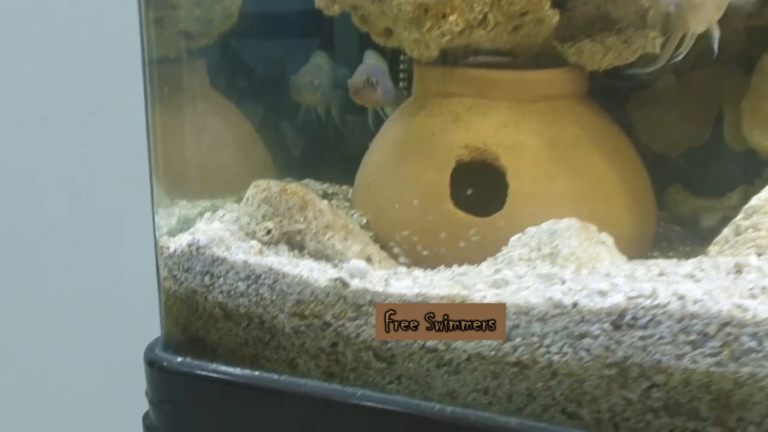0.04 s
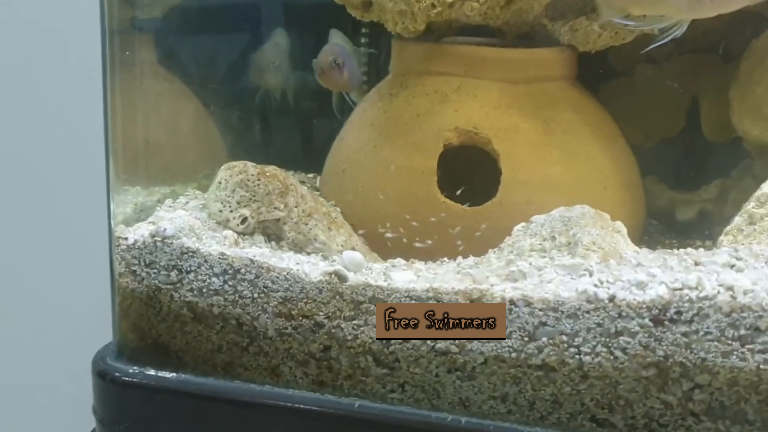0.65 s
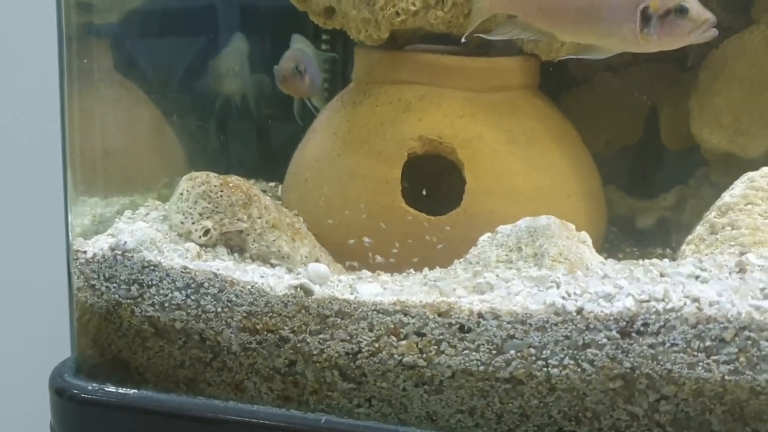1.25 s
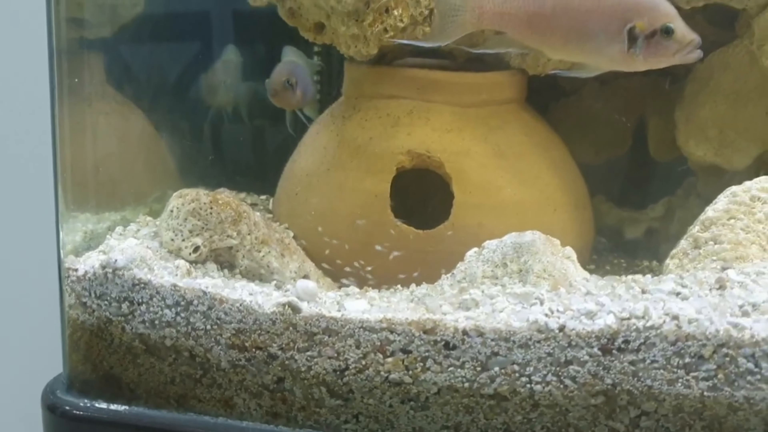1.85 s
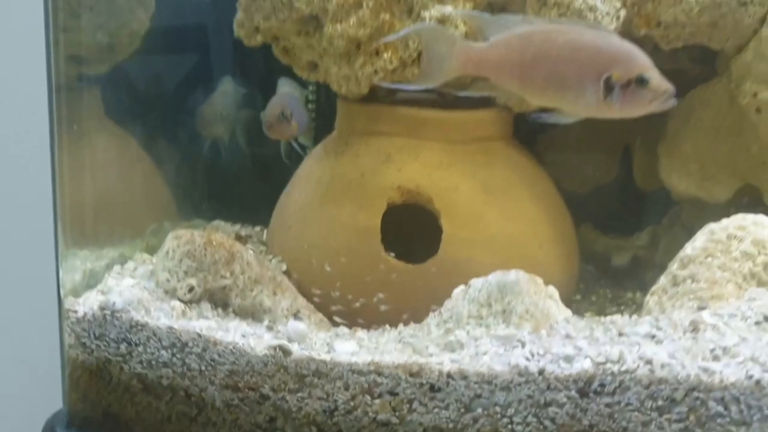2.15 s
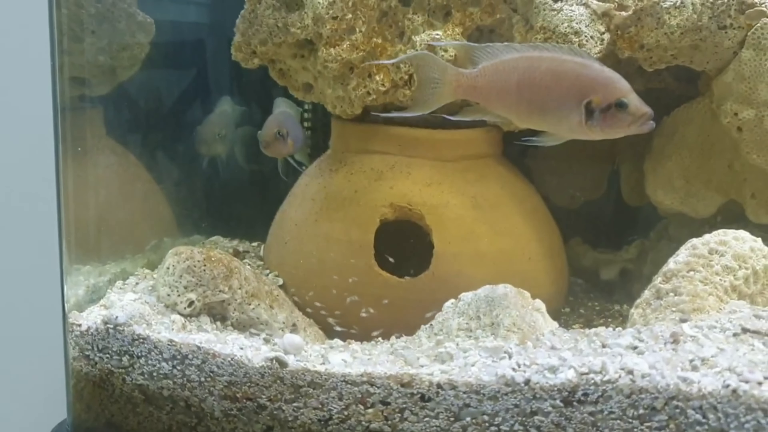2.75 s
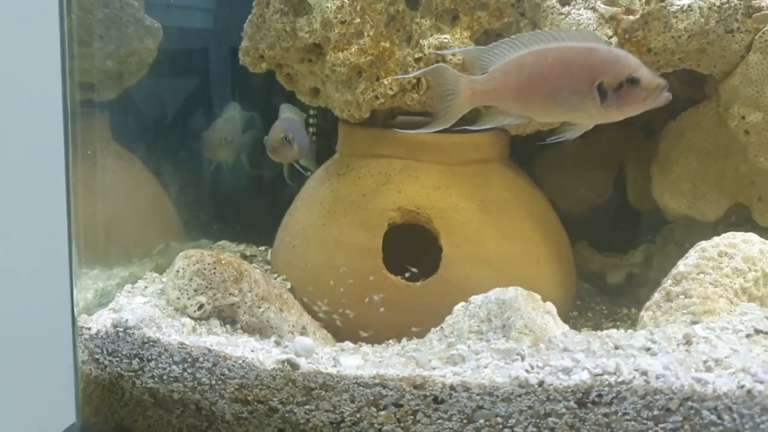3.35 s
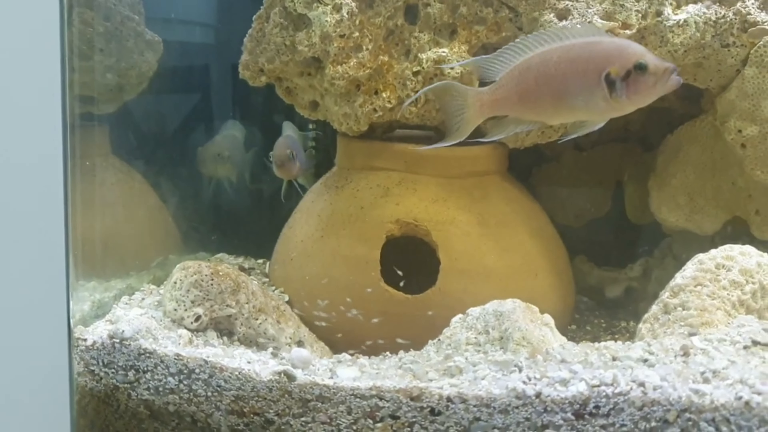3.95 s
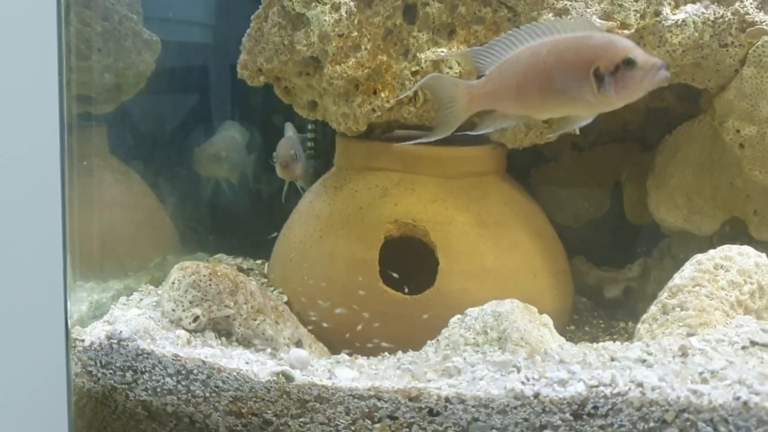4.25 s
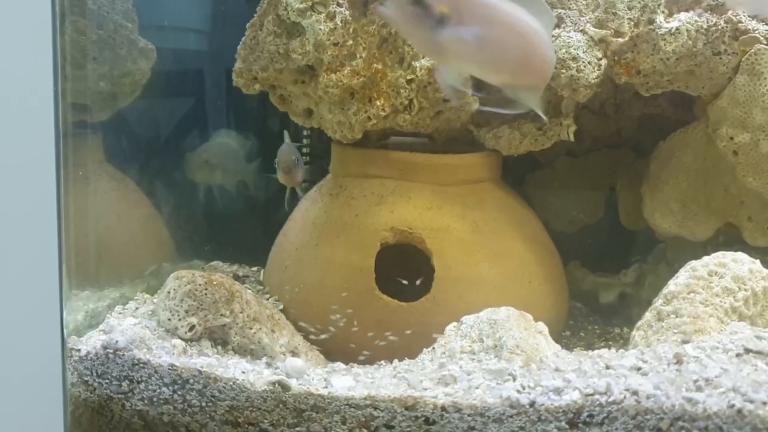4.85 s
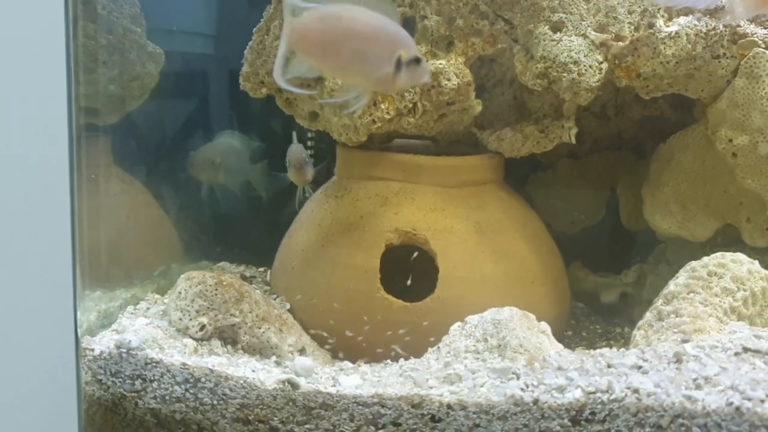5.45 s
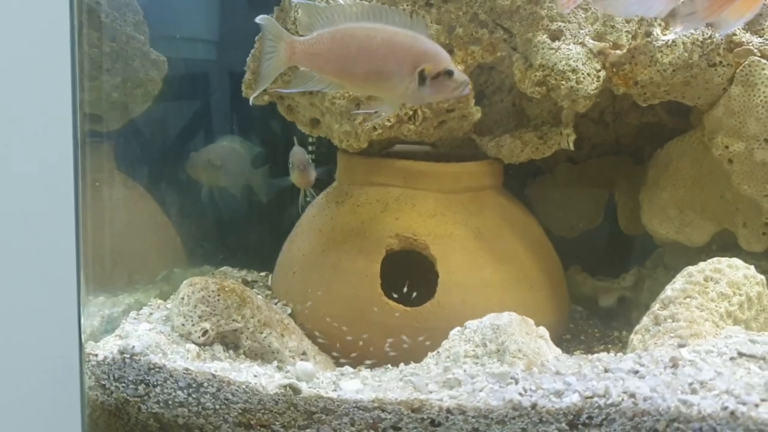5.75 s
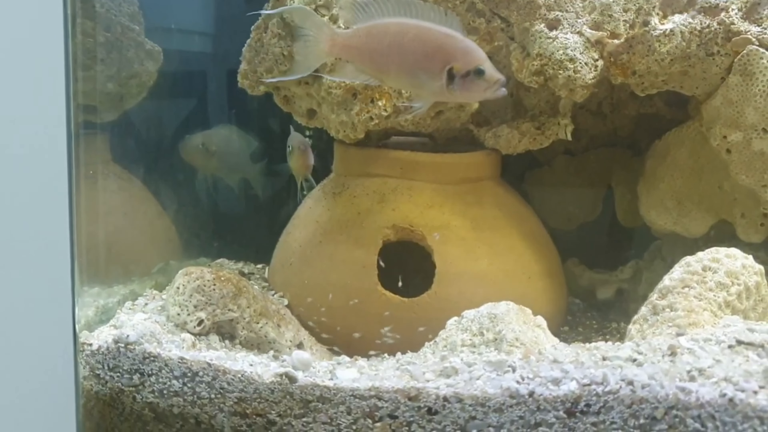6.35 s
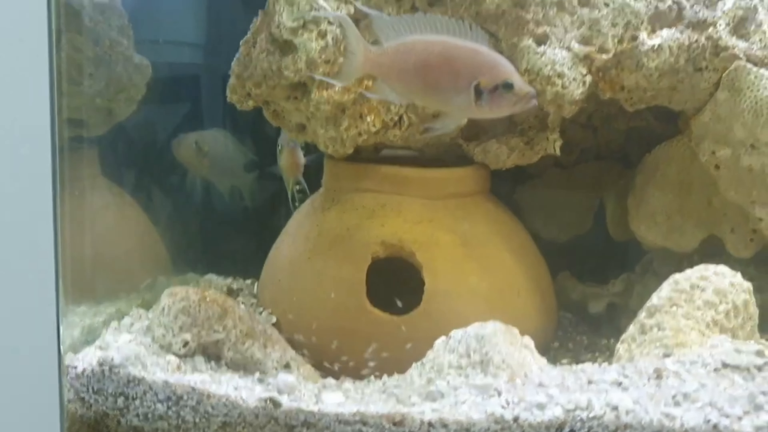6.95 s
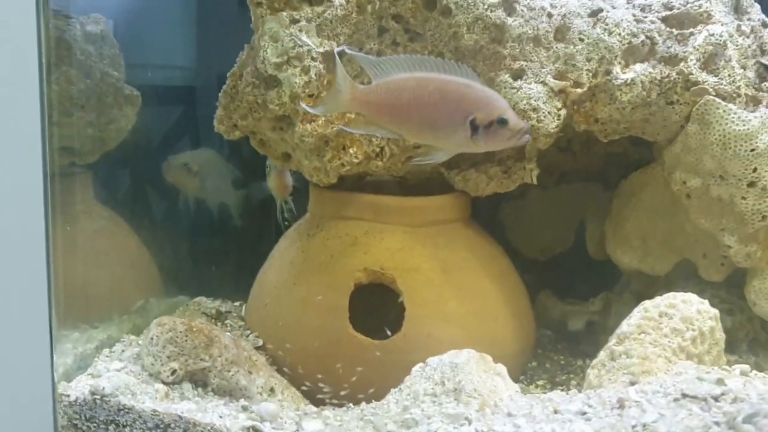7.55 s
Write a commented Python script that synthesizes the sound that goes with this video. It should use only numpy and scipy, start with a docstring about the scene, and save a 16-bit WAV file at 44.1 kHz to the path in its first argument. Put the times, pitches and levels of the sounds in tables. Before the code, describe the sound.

An aquarium pump hums low and steady throughout in a small room, with a slightly throbbing electrical buzz and a fan-like tone that gently swells and sinks. Moving water and air make a dull rumble, and a very faint hiss flickers on the right. Between about 1 and 3 seconds the water wells up several times, with soft, low thumps near 1.5 and 2.3 seconds. A faint rub comes from the right at around 1.5 to 1.8 seconds. Soft rubbing and rustling returns on the right from about 5.1 to 5.5 seconds. At about 6.3 seconds there is one short, clinking knock that rings briefly in the room, surrounded by more rustling until 6.6 seconds. A few lighter rubs follow up to about 7.2 seconds, while the hum continues unchanged to the end at around 7.5 seconds.

```python
"""A small room with an aquarium. The pump's motor hums, turning just slower than the mains current that
makes it buzz, beside a fan-like tone. Moving water and air rumble below a faint, flickering hiss, and
early on the water wells up a few times. Off to the right something rubs and rustles softly now and then,
once with a short, clinking knock that rings in the room."""
import sys
import numpy as np
from scipy import signal
from scipy.fft import rfft, irfft, next_fast_len
from scipy.io import wavfile
from scipy.ndimage import map_coordinates

SR = 44100
rng = np.random.default_rng(int(sys.argv[2]) if len(sys.argv) > 2 else 0)


def wav_out(sig):
    """Save sig, one row per channel (or a flat mono array), as 16-bit PCM at SR to the path in sys.argv[1]."""
    wavfile.write(sys.argv[1], SR, np.round(np.clip(np.atleast_2d(sig).T, -1, 1) * 32767).astype(np.int16))


N = 335160

# tones of the pump's turning shaft: multiple, gain_db, left_minus_right_db
SHAFT_TONES = [(1, 0.5, -0.5), (4, -21, 1.5), (5, -27, 2.5)]
# slow drift in the strength of those tones: time_s, level_db
SHAFT_LEVELS = [(0.08, -37), (0.65, -34.5), (1.17, -36), (2.5, -35.5), (2.919, -35), (4.06, -35),
                (4.7, -36.5), (4.95, -35.5), (5.29, -34.5), (5.5, -38), (5.65, -36), (7.5, -37)]
# magnetic buzz of the mains: multiple, level_db, left_minus_right_db
BUZZ_TONES = [(2, -58.5, -0.5), (4, -51, -5), (6, -50, -4), (8, -70, -0.5), (11, -76, -3.5),
              (12, -81.5, -1.5), (17, -74.5, 3.5), (19, -83, -1)]
# how loud the fan-like tone is heard amid the rumble: time_s, level_db
FAN_LEVELS = [(0, -48.5), (.6, -49.5), (.88, -49.5), (1.2, -46), (1.65, -48.5), (2.4, -46), (2.8, -51.5),
              (3.12, -45), (3.5, -50.5), (4.55, -51.5), (4.9, -46), (5.17, -54), (5.45, -48.5), (5.8, -50),
              (7.3, -50.5), (7.6, -51)]
# faint motor tones: pitch_hz, level_db
MOTOR_WHINES = [(419, -69.5), (541, -80), (589, -81.5)]
# pitches at which tank, stand and room boom: pitch_hz, width_hz, gain_db
TANK_RESONANCES = [(62.8, 4.9, 1), (74.5, 1.9, -3), (86.2, 5, -10), (109.7, 5, -9.5), (132.6, 12, -4),
                   (150.2, 6, -7), (208, 20, -8.5), (235, 29, -14), (287.5, 30, -16)]
# rush of water and air: pitch_hz, gain_db
RUSH_COLOUR = [(15, -18), (30, -5.5), (55, 2.5), (170, -2.5), (290, -6.5), (335, -10), (480, -16),
               (600, -16), (850, -18.5), (1050, -27), (1400, -39), (3000, -53), (8000, -85.5)]
# ringing of the stirred water: pitch_hz, width_hz, gain_db
WATER_RESONANCES = [(359, 14, -2.5), (411, 9.7, 0), (463, 15, -3.5), (781, 27, -11)]
# airy hiss: pitch_hz, gain_db
HISS_COLOUR = [(300, -18), (1100, 8.5), (1900, 6.5), (2550, 7), (3100, 1.5), (3800, -13), (5000, -33.5),
               (9000, -37.5), (14500, -32.5)]
# slow drift of the hiss: time_s, level_db
HISS_DRIFT = [(1.001, -69.5), (4.9, -68.5), (5.599, -67.5), (7.6, -68.5)]
# the flickering top of the hiss: pitch_hz, gain_db
TREBLE_COLOUR = [(2500, -26), (3600, 6), (5000, -2), (6800, -10), (9000, -20), (12000, -1.5), (14500, -5.5)]
# water welling up: peak_s, level_db, rise_s, pitch_hz
WATER_SURGES = [(1.2, -54.5, 0.052, 475), (1.52, -43, .08, 137.3), (1.721, -57, 0.27, 422),
                (2.26, -39, 0.092, 136.5), (2.3, -57.5, 0.094, 446), (2.89, -54, 0.025, 415)]
# rubs: peak_s, level_db, rise_s, hold_s, fade_s, tilt_db_per_octave, ring_hz, ring_db, top_hz
RUBS = [(1.49, -70, 0.06, 0.011, 0.53, 2, 4620, 0.5, 9200),
        (1.803, -73, 0.018, 0.049, 0.065, 8, 4900, -5.5, 15000),
        (5.14, -63.5, 0.031, 0.035, 0.2, 5.5, 8400, 8.5, 15000),
        (5.222, -65, 0.025, .055, .12, -0.5, 8200, 15.5, 12000),
        (5.354, -59, 0.022, 0.032, 0.25, -0.8, 1100, 9, 7500),
        (5.36, -71.5, 0.016, 0.045, 0.28, 4.5, 5760, 6.5, 7500),
        (6.242, -59, 0.016, 0.039, 0.47, 6, 3800, 6.5, 11000),
        (6.407, -55.5, 0.008, 0.021, 0.44, -0.3, 2230, 4, 6000),
        (6.474, -57.5, 0.008, 0.025, .36, 1.5, 2250, 6.5, 5170),
        (6.57, -69, 0.017, 0.035, 0.16, 2, 2900, 7, 9050),
        (6.847, -66.5, 0.016, 0.075, .3, 6.5, 4100, 10, 9480),
        (7.045, -72.5, .035, 0.072, 0.12, 10, 6500, 3, 10000),
        (7.193, -72, 0.022, 0.054, 0.15, 6.5, 6030, -1, 10000)]
# friction noise that all rubs start from: pitch_hz, gain_db
RUB_COLOUR = [(400, -30), (850, 11.5), (1200, -1), (2300, -0.5), (3200, -5), (4400, -8), (5400, -13.5),
              (6600, -13.5), (9000, -27), (14000, -24.5)]
# the knock's light touch and full blow: start_s, level_db
KNOCK_CONTACTS = [(6.2554, -48), (6.2612, -45.7)]
# tones of the struck thing: pitch_hz, gain_db, fade_s
KNOCK_TONES = [(1385, -5.5, .06), (1445, -3.5, .055), (1525, -4.5, .055), (1640, .5, .07), (1715, -2, .09)]
# the knock's lingering ring: pitch_hz, width_hz, gain_db
LINGERING_RESONANCES = [(1520, 130, -7), (1680, 80, -2)]
# how long the room's echo lasts: pitch_hz, fade_s
ROOM_FADES = [(200, .5), (1600, 0.94), (5000, 0.82), (12000, 0.22)]
# how alike noise is at the two ears: pitch_hz, likeness (1 = the same)
EAR_LIKENESS = [(60, 0.96), (130, 0.98), (290, 0.91), (640, .65), (1390, 0.034), (3000, 0.099)]
# balance of a sound off to the right: pitch_hz, left_minus_right_db
RIGHT_BALANCE = [(900, 0), (1400, -5.5), (2400, -7), (4300, -5.5), (7000, -3), (10000, 1)]

MAINS_HZ, SHAFT_HZ, FAN_TONE_HZ = 50.025, 49.13, 232.09


def amp(db):
    """Turn decibels into a gain."""
    return 10 ** (np.asarray(db) / 20)


def clock():
    """The time of every sample, in seconds."""
    return np.arange(N) / SR


def over_time(points):
    """Join (time_s, value) points with straight lines."""
    return np.interp(clock(), *np.transpose(points))


def at_pitch(points, hz):
    """Read between (pitch_hz, value) points, with octaves about evenly spaced."""
    pitches, values = np.transpose(points)
    return np.interp(np.log(hz + 1), np.log(pitches + 1), values)


def pan(side_db):
    """Left and right gains; above 0 dB the left is louder."""
    return amp(np.array([[.5], [-.5]]) * side_db)


def wobble(per_s):
    """A smooth curve through per_s random values a second."""
    return map_coordinates(rng.standard_normal(int(N * per_s / SR) + 4), [clock() * per_s])


def filtered(x, response):
    """Scale each pitch in x by response(hz)."""
    length = x.shape[-1]
    size = next_fast_len(length + SR // 2)
    return irfft(rfft(x, size) * response(np.fft.rfftfreq(size, 1 / SR)), size)[..., :length]


def resonances(peaks, hz):
    """A gain curve with a steep peak at each pitch where something rings."""
    power = sum(amp(db) ** 2 / (1 + 2 * ((hz - pitch) / width) ** 2) ** 2 for pitch, width, db in peaks)
    return np.sqrt(power)


def noise(colour, size=N):
    """Stereo noise of strength 1, shaped by colour(hz); the ears hear alike only in the bass."""
    def response(hz):
        spread = np.arccos(np.clip(at_pitch(EAR_LIKENESS, hz), -1, 1)) / 2
        return colour(hz) * np.array([np.cos(spread), np.sin(spread)])
    mid, side = filtered(rng.standard_normal((2, size)), response)
    stereo = np.array([mid + side, mid - side])
    return stereo / np.sqrt(np.mean(stereo ** 2) + 1e-20)


def tone(turns, flutter_db, sway_rad):
    """A motor tone that wavers slightly in strength and timing."""
    phase = 2 * np.pi * (turns + rng.random()) + sway_rad * wobble(3)
    return np.sqrt(2) * np.sin(phase) * amp(flutter_db * wobble(6.7))


def swell(peak_s, rise_s, fade_s, hold_s=0):
    """Build up, hold and die away; fade_s is always the time to fall by 60 dB."""
    t = clock() - peak_s
    rising = np.exp(-(np.minimum(t, 0) / rise_s) ** 2)
    return rising * amp(-60 * np.maximum(t - hold_s, 0) / fade_s)


def from_right(x):
    """Make most of the treble louder in the right ear."""
    return filtered(x, lambda hz: pan(at_pitch(RIGHT_BALANCE, hz)))


def room_echo(x):
    """The walls throw sound back; the highest pitches die soonest."""
    hz, t, spectrum = signal.stft(rng.standard_normal((2, SR // 2)), SR, nperseg=256)
    fade = amp(-60 * t / at_pitch(ROOM_FADES, hz)[:, None])
    tail = signal.istft(spectrum * fade, SR, nperseg=256)[1]
    return signal.fftconvolve(x, tail / np.linalg.norm(tail[0]), axes=1)[:, :N]


def pump():
    """The shaft slips behind the mains, so its tone at four times its speed throbs against the buzz."""
    turns = SHAFT_HZ * clock() + 0.035 * wobble(1)
    shaft = sum(amp(db) * pan(side) * tone(multiple * turns, flutter_db=-0.2, sway_rad=0.06)
                for multiple, db, side in SHAFT_TONES)
    cycles = MAINS_HZ * clock()
    buzz = sum(amp(db) * pan(side) * tone(multiple * cycles, flutter_db=1.18, sway_rad=0.019)
               for multiple, db, side in BUZZ_TONES)
    hum = amp(over_time(SHAFT_LEVELS) - 0.23) * shaft + buzz
    delay_s = np.array([[.00005], [-.00005]])  # it reaches the right ear first
    return filtered(hum, lambda hz: np.exp(-2j * np.pi * hz * delay_s))


def fan():
    """A fan-like tone, heard swelling and sinking amid the low rumble, with faint whines above it."""
    whines = sum(amp(db) * tone(hz * clock(), flutter_db=3, sway_rad=.3) for hz, db in MOTOR_WHINES)
    fan_tone = tone(FAN_TONE_HZ * clock(), flutter_db=0.44, sway_rad=0.3)
    return amp(over_time(FAN_LEVELS)) * fan_tone + whines


def flow():
    """Swirling water and air make the tank boom, with a dull rush and a constant soft stirring."""
    boom = amp(-45) * noise(lambda hz: resonances(TANK_RESONANCES, hz))
    rush = amp(-47) * noise(lambda hz: amp(at_pitch(RUSH_COLOUR, hz)))
    stirring = amp(-62.5 + 1.5 * wobble(7)) * noise(lambda hz: resonances(WATER_RESONANCES, hz))
    return boom + rush + stirring


def hiss():
    """The flow also gives a faint, wavering hiss on the right."""
    level_db = over_time(HISS_DRIFT) + .7 * wobble(6.6)
    return amp(level_db) * from_right(noise(lambda hz: amp(at_pitch(HISS_COLOUR, hz))))


def flicker():
    """The top of the hiss flickers on and off a little unevenly, about six times a second."""
    rate_hz, sharpness, off_bias = 6.08, 4.9, .22  # the bias keeps it off longer than on
    phase = 2 * np.pi * rate_hz * (clock() - .007) + .35 * wobble(14)
    on = (1 + np.tanh(sharpness * (np.cos(phase) - off_bias))) / 2
    return on * amp(-77.5 + 1.8 * wobble(6)) * noise(lambda hz: amp(at_pitch(TREBLE_COLOUR, hz)))


def surges():
    """Water wells up, rings around one pitch and settles; the lowest surges are soft thumps."""
    width_hz = 25
    out = np.zeros((2, N))
    for peak_s, db, rise_s, pitch_hz in WATER_SURGES:
        water = noise(lambda hz: resonances([(pitch_hz, width_hz, 0)], hz))
        out += amp(db) * swell(peak_s, rise_s, fade_s=0.34) * water
    return out


def scuffs():
    """Each rub is grainy friction noise with one broad ring; light rubs tend to be brighter."""
    out = np.zeros((2, N))
    for peak_s, db, rise_s, hold_s, fade_s, tilt_db, ring_hz, ring_db, top_hz in RUBS:
        def colour(hz):
            tilt = tilt_db * np.log2(hz / SR + 1e-3)
            ring = ring_db / (1 + ((hz / ring_hz - 1) / .16) ** 2)  # width: 16% of its pitch
            return amp(at_pitch(RUB_COLOUR, hz) + tilt + ring) / np.hypot(1, (hz / top_hz) ** 4)
        start = int(np.clip(round(peak_s * SR) - SR // 4, 0, N - SR))
        span = slice(start, start + SR)  # a rub is over within a second
        out[:, span] += amp(db) * swell(peak_s, rise_s, fade_s, hold_s)[span] * noise(colour, size=SR)
    out *= amp(1.6 * wobble(per_s=260))  # the surfaces catch and slip
    return out + amp(-13) * room_echo(out)


def knock():
    """Two quick contacts set close tones clinking; the upper ones ring on in the room."""
    attack_s = .0009
    struck = np.zeros((2, N))
    for start_s, db in KNOCK_CONTACTS:
        t = np.maximum(clock() - start_s, 0)
        tones = sum(amp(gain_db - 60 * t / fade_s) * np.sin(2 * np.pi * hz * t)
                    for hz, gain_db, fade_s in KNOCK_TONES)
        struck += amp(db) * (1 - np.exp(-t / attack_s)) * tones
    ring = amp(-55.3) * noise(lambda hz: resonances(LINGERING_RESONANCES, hz))
    ring *= swell(peak_s=6.28, rise_s=0.027, fade_s=.75)
    return struck + ring + amp(-16) * room_echo(struck)


def scene():
    """Machinery and water, with the small noises off to the right."""
    return pump() + fan() + flow() + hiss() + surges() + from_right(scuffs() + knock() + flicker())


def record(dry):
    """Cut away the very highest treble."""
    return filtered(dry, lambda hz: hz < 14500)


dry = scene()
out = record(dry)
wav_out(out)
```